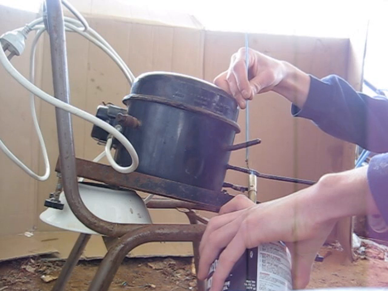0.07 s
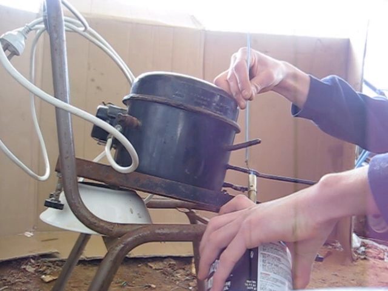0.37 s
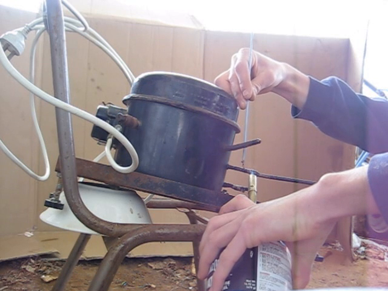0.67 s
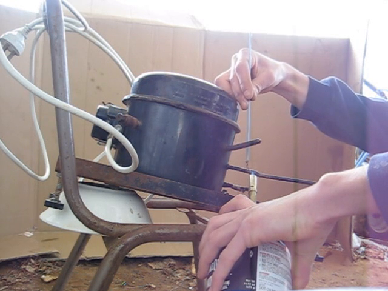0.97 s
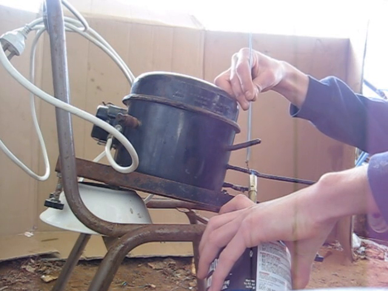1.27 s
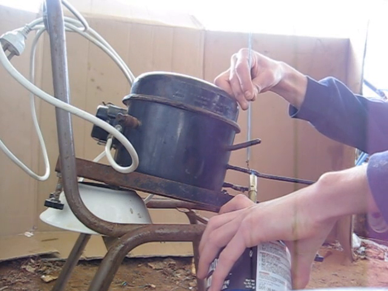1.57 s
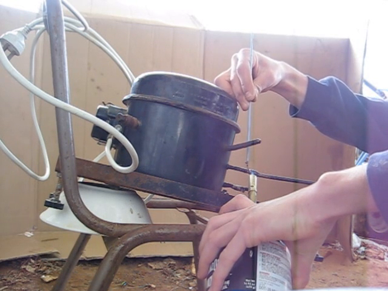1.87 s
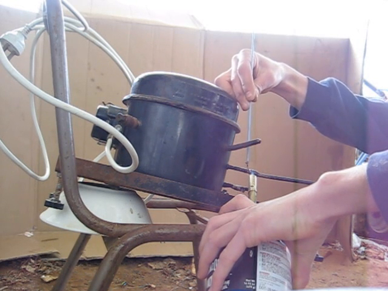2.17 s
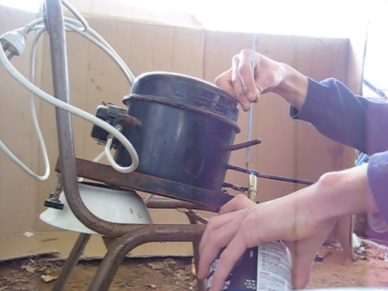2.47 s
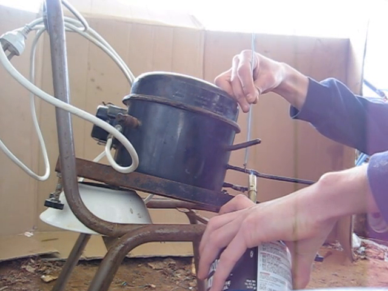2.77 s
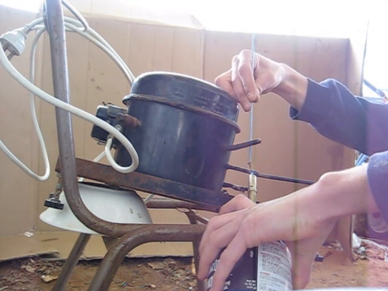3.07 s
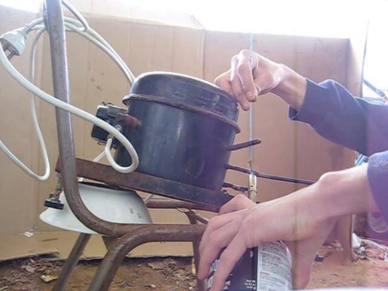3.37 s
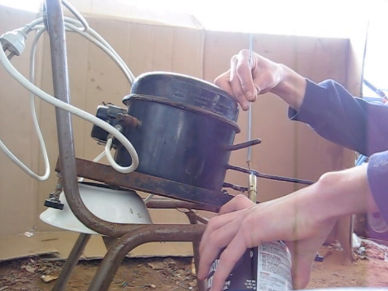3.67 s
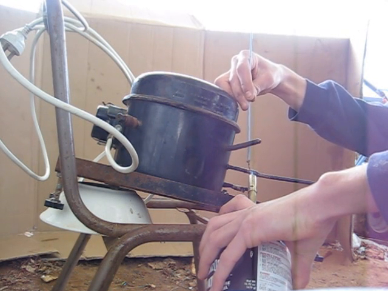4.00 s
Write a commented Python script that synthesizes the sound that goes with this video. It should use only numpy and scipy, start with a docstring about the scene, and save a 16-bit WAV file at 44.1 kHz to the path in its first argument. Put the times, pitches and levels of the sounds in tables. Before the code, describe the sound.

A hand-held gas torch burns continuously for about four seconds, heard close up outdoors in front of a cardboard screen. From the start, a midrange flame roar with little bass sits under the fine hiss of the gas jet, with a faint, thin, very high whine on top. Short reflections from nearby surfaces make it slightly hollow. Around 0.7 seconds the flame settles on a copper pipe joint, the roar lifts a little and soft breathy whistles come in. It swells gently near 2 seconds, with a brief bright edge on the hiss at about 2.2 seconds. At 2.6 seconds the hot joint gives one tiny, high spit, and the roar eases back and keeps burning to the end. Small, quick flares and dips ruffle the flame throughout, for instance near 0.5, 0.9, 2.1, 3.1 and 3.6 seconds.

```python
"""A hand-held gas torch burns against a copper pipe joint, outdoors in front of a cardboard screen.
From the start the flame roars under the hiss of the gas jet, both hollowed by short, close echoes,
with a faint high whine on top. Around 0.7 s the flame settles on the joint: the mids lift and breathy
whistles come in. It swells near 2 s as it plays fully on the pipe, with a brief bright edge. The hot
joint spits once at 2.6 s and the roar eases back. Quick flares and sags ruffle it throughout."""
import sys
import numpy as np
from scipy import signal
from scipy.fft import rfft, irfft
from scipy.io import wavfile

SR = 44100
rng = np.random.default_rng(int(sys.argv[2]) if len(sys.argv) > 2 else 0)


def waveform_to_disk(signal):
    """Save audio, clipped to [-1, 1], as 16-bit WAV at the path in sys.argv[1]."""
    frames = np.transpose(np.atleast_2d(signal))
    scaled = np.clip(frames, -1, 1) * 32767
    samples = np.round(scaled).astype(np.int16)
    wavfile.write(sys.argv[1], SR, samples)


N = 187028
TIME = np.arange(N) / SR
FREQ = np.maximum(np.arange(N // 2 + 1) * SR / N, 1)


def flame(space, burn_db=-39, rush_db=-28.5, split_hz=850, flicker_db=0.12, eddy_db=0.23):
    """Turbulent burning: a low burn for body, under a midrange rush that flickers, flares and whistles."""
    # tone of the roar: (frequency [Hz], relative level [dB])
    roar_curve = [(30, -36), (100, -29), (190, -18.5), (230, -26), (410, -10.5), (900, -4.5), (1710, 0),
                  (3490, 0.2), (3830, -14.5), (6000, -30), (12000, -65)]
    # quick flares of the flame: (time [s], half-width [s], lift [dB])
    flares = [(0.488, .009, 2.5), (0.808, 0.0092, 2.5), (0.926, 0.0084, 3.5), (1.06, .06, 1),
              (1.24, .05, 1), (2.11, 0.012, 3.5), (2.642, .012, 1), (2.93, .04, 1), (3.058, 0.017, 2.2),
              (3.6, 0.019, 2)]
    # quick sags of the flame: (time [s], half-width [s], change [dB])
    sags = [(0.445, .02, -1.8), (3.105, 0.013, 0), (3.18, .025, -1.2), (3.42, .025, -0.5),
            (3.995, .018, -1.7)]
    roar = colour(roar_curve) * space
    low_share = 1 / (1 + (FREQ / split_hz) ** 20)
    burn = unit(noise(roar * np.sqrt(low_share)))
    burn *= undb(burn_db - 0.5 * fade_in(2.7, 0.3))  # thins as the swell passes
    rush = unit(noise(roar * np.sqrt(1 - low_share)))
    force_db = pipe_contact() + sum(db * bump(at_s, width_s) for at_s, width_s, db in flares + sags)
    # the flame tip flickers slowly, while small eddies roughen it
    unrest_db = flicker_db * drift(24) + eddy_db * drift(170)
    rush *= undb(rush_db + force_db + unrest_db)
    return burn + rush + joint_whistles(force_db)


def pipe_contact(unsettled_db=-1.07, swell_db=1.22):
    """Level ride of the rush in dB: the flame settles, swells as it plays fully on the pipe, eases back."""
    return unsettled_db * (1 - settled()) + swell_db * bump(2.05, 0.72)


def settled():
    """How far the flame has settled on the joint, from 0 to 1."""
    return fade_in(0.7, 0.14)


def joint_whistles(force_db, growth=1.6):
    """Breathy resonances that speak once the flame is on the joint and grow faster than the rush."""
    # whistles of the flame on the joint: (frequency [Hz], width [Hz], base level [dB])
    whistles = [(1350, 53, -48), (1756, 42, -43), (2156, 49, -49), (3250, 40, -50.5)]
    return noise_bands(whistles) * settled() * undb(growth * force_db)


def gas_jet(space, level_db=-41.0, flicker_db=0.15, eddy_db=0.94):
    """Gas leaving the tiny orifice: a fine-grained treble hiss, steady wherever the flame points."""
    # tone of the jet: (frequency [Hz], relative level [dB])
    hiss_curve = [(2500, -28), (4010, 3), (4900, -0.3), (5990, 1.3), (6450, -1.2), (7430, -2.5), (7670, -8),
                  (7940, -6), (8440, -8), (8900, -3.5), (9580, -2), (10800, -4), (11220, -3.5),
                  (11460, -11), (11890, -3), (12190, -1.2), (12620, -11), (12880, -6), (13600, -6.5),
                  (14080, -13), (15600, -17.5)]
    hiss = unit(noise(colour(hiss_curve) * space * ground_scatter()))
    return hiss * undb(level_db + flicker_db * drift(12) + eddy_db * drift(380))


def bright_edge():
    """A brief sheen on the hiss near the top of the swell."""
    # bands of the sheen: (frequency [Hz], width [Hz], level at its height [dB])
    bands = [(2850, 110, -47), (3130, 110, -46), (4120, 200, -47), (5970, 200, -54)]
    return noise_bands(bands) * bump(2.2, 0.16)


def joint_spit():
    """One tiny pop at the hot joint, ringing for a few milliseconds."""
    # the pop: (time [s], pitch [Hz], decay [s], peak level [dB])
    pop = (2.584, 8600, .005, -37)
    at_s, hz, decay_s, db = pop
    age = np.maximum(TIME - at_s, 0)
    return undb(db) * np.exp(-age / decay_s) * np.sin(2 * np.pi * hz * age)


def hollow_colour(dull_hz=8000):
    """Unmoving colour: direct sound plus close echoes, through narrow peaks and notches."""
    # echoes off cardboard, compressor shell and ground: (delay [ms], gain [linear])
    echoes = [(1.681, 0.12), (1.925, 0.11), (3.167, 0.043), (4.018, 0.06), (4.381, 0.068), (7.333, 0.13),
              (7.48, 0.12), (10.433, 0.072), (11.215, 0.068), (15.194, 0.17)]
    # peaks and notches: (frequency [Hz], width [Hz], gain [dB]); up to 5.6 kHz, the burner and its nook;
    # the last peak is heard as a thin, faint, steady high whine near 15.1 kHz
    peaks_and_notches = [(289.3, 36, 8), (398, 23, 4), (533, 44, 4.5), (680, 33.5, 12.5), (687, 36, -12.2),
                         (731, 19, 7.5), (754, 15, -7), (868, 34, -5), (948, 138, 7.5), (1003, 18, -8.5),
                         (1050, 30, 1.5), (1148, 18, -5), (1217, 15, -6.5), (1232, 19, 6.5), (1290, 14, -4),
                         (1360, 140, 7.0), (1404, 17, -6), (1580, 22, -6.5), (1607, 21, 5.5),
                         (1753, 36, 4.5), (1853, 45, -3.5), (1883, 23, 4), (1950, 22, -5.5), (1994, 70, 2),
                         (2103, 26, -6), (2144, 58, 7), (2280, 17, 2), (2340, 30, 3), (2363, 14, -12),
                         (2444, 51, -8), (2533, 58, 3), (2680, 157, -6.5), (2675, 20, 4.5), (2832, 13, -6),
                         (2875, 30, 1), (2960, 50, -3), (3050, 20, -6), (3198, 40, -11), (3230, 31, 5.5),
                         (3290, 20, -5), (3410, 30, 2), (3460, 43, -10.5), (3560, 25, -14), (3650, 25, 1.5),
                         (4020, 114, 5), (4270, 76, -7), (4400, 41, 6), (4455, 22, -10), (4510, 46, 7.5),
                         (4585, 22, -8), (4580, 30, 6), (4720, 36, 1.5), (4780, 51, 5), (5600, 30, -7),
                         (15139, 65, 9)]
    reflected = sum(gain * np.exp(-2j * np.pi * FREQ * ms / 1000) for ms, gain in echoes)
    # rough and curved surfaces scatter the highest treble away
    paths = 1 + reflected / np.sqrt(1 + (FREQ / dull_hz) ** 2)
    return paths * undb(sum(db * bell(hz, width) for hz, width, db in peaks_and_notches))


def ground_scatter(tail_db=-10.5, decay_s=0.01, dull_hz=8000):
    """Clutter and ground litter add a short diffuse tail that finely ripples the spectrum of the hiss."""
    tail = rng.standard_normal(N) * np.exp(-TIME / decay_s)
    tail /= np.linalg.norm(tail)
    return 1 + undb(tail_db) * rfft(tail) / np.sqrt(1 + (FREQ / dull_hz) ** 4)


def noise_bands(bands):
    """A stack of breathy noise bands, one for each (frequency [Hz], width [Hz], level [dB])."""
    return sum(undb(db) * unit(noise(bell(hz, width))) for hz, width, db in bands)


def noise(gain):
    """Gaussian noise with the given gain at each frequency."""
    return irfft(rfft(rng.standard_normal(N)) * gain, N)


def drift(rate_hz):
    """Random wobble of rms 1, rolling off above rate_hz."""
    return unit(noise(1 / (1 + (FREQ / rate_hz) ** 4)))


def colour(points):
    """EQ curve through (frequency [Hz], level [dB]) points on a log-frequency axis."""
    hz, db = np.transpose(points)
    return undb(np.interp(np.log(FREQ), np.log(hz), db))


def bell(hz, width_hz):
    """Shape of one resonance, 1 at its centre."""
    return 1 / (1 + (2 * (FREQ - hz) / width_hz) ** 2)


def bump(at_s, half_width_s):
    """Smooth rise and fall, reaching 1 at at_s."""
    return np.exp(-((TIME - at_s) / half_width_s) ** 2)


def fade_in(at_s, ease_s):
    """Smooth rise from 0 to 1, halfway at at_s."""
    return (1 + np.tanh((TIME - at_s) / ease_s)) / 2


def undb(db):
    """Decibels to gain."""
    return 10 ** (np.asarray(db) / 20)


def unit(x):
    """Scale to rms 1."""
    return x / np.std(x)


def scene():
    """Mono mix: flame and jet share one colour, with the sheen and the spit laid on top."""
    space = hollow_colour()
    return (flame(space) + gas_jet(space) + bright_edge() + joint_spit())[None]


def record(dry):
    """A steep high cut takes off the topmost air."""
    cutoff_hz = 15650
    high_cut = signal.ellip(12, .1, 90, cutoff_hz, fs=SR, output="sos")
    return signal.sosfilt(high_cut, dry)


dry = scene()
out = record(dry)
waveform_to_disk(out)
```